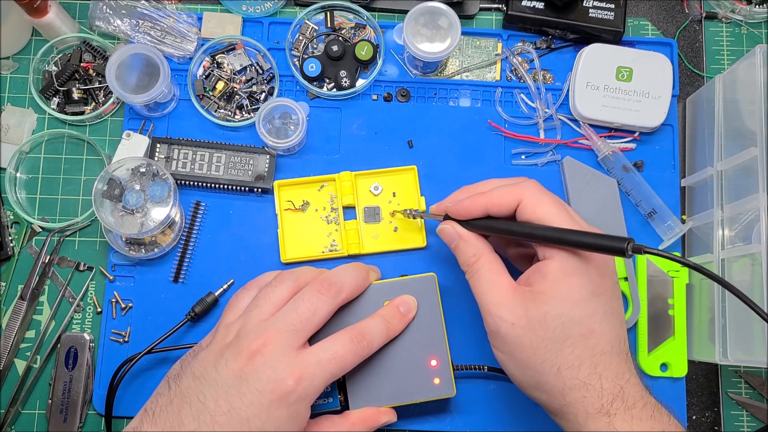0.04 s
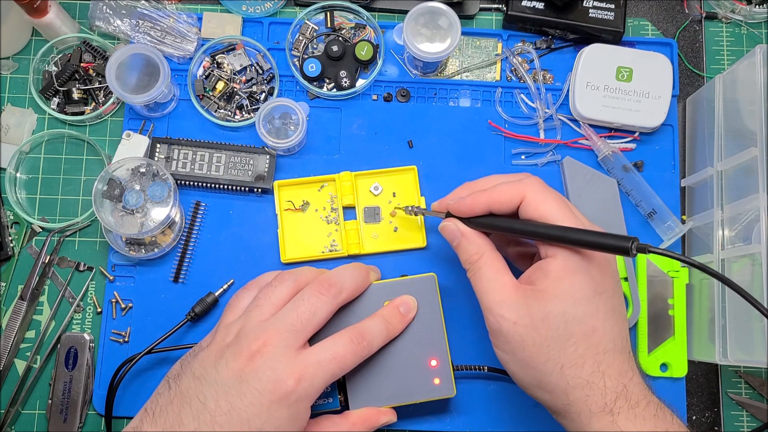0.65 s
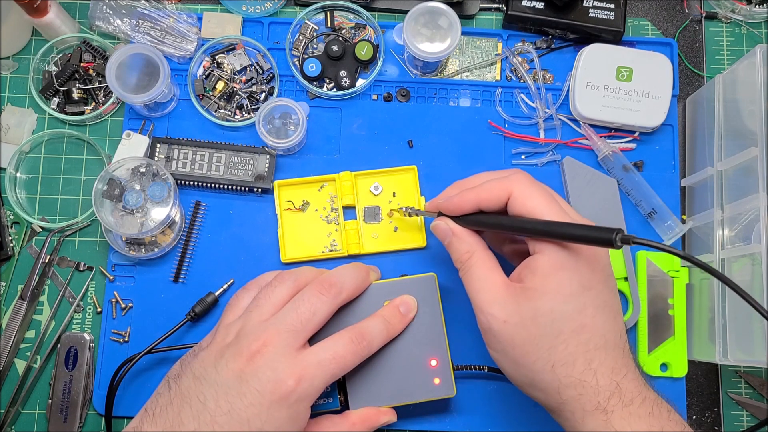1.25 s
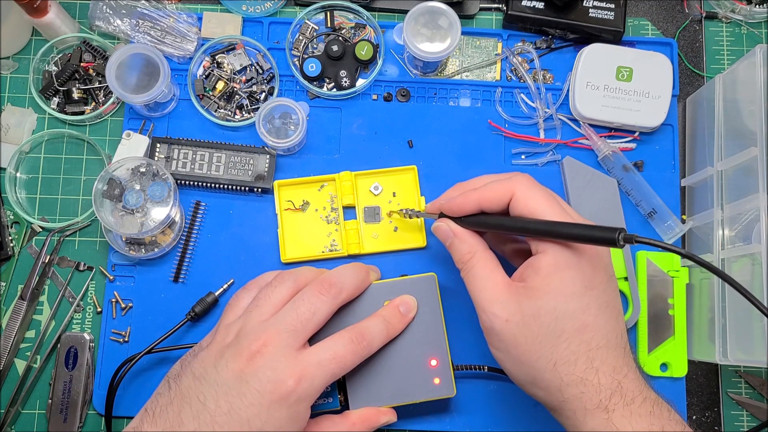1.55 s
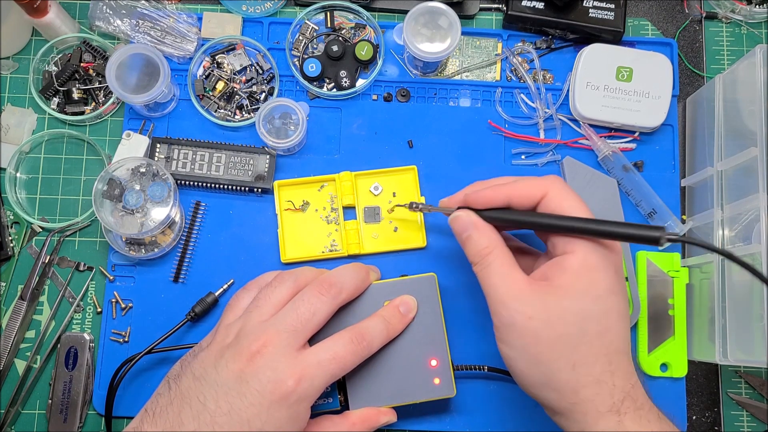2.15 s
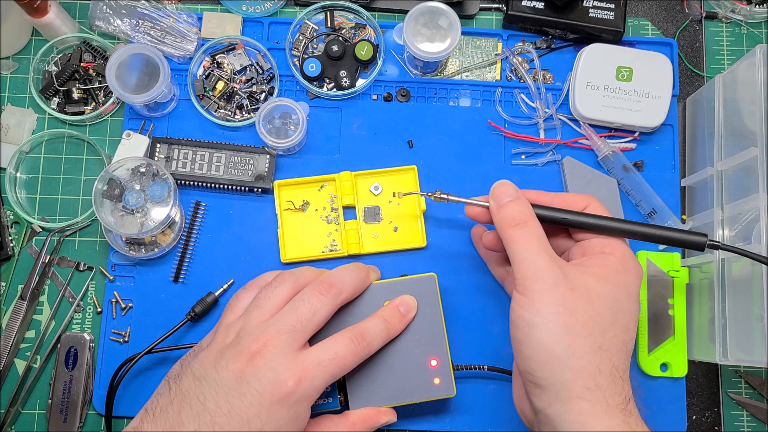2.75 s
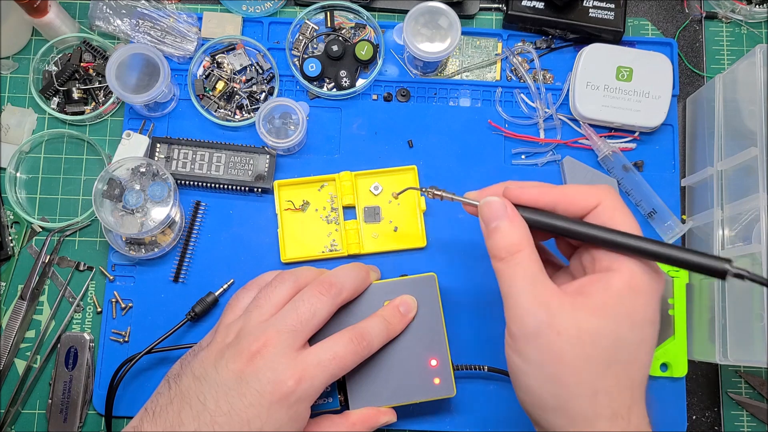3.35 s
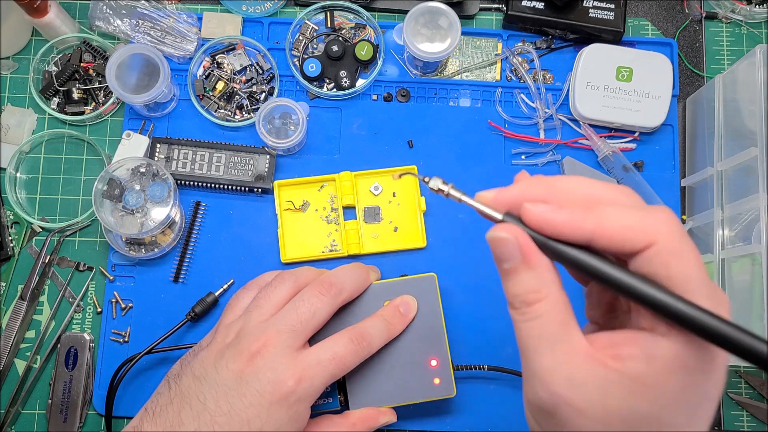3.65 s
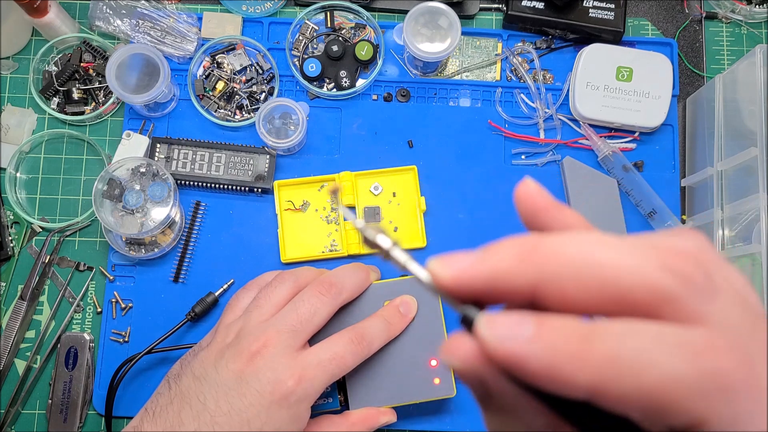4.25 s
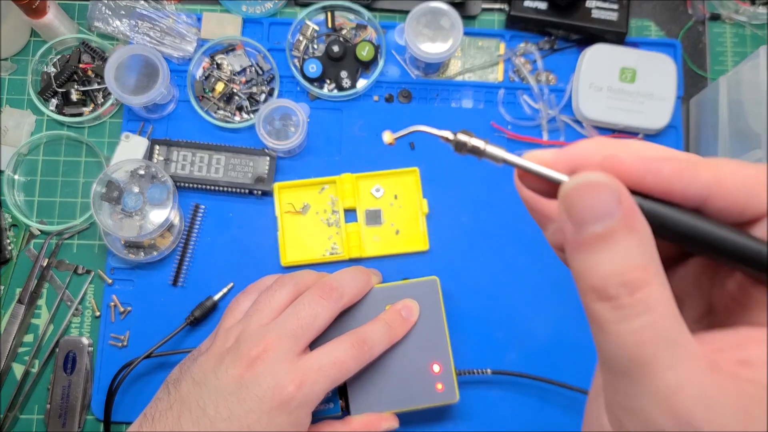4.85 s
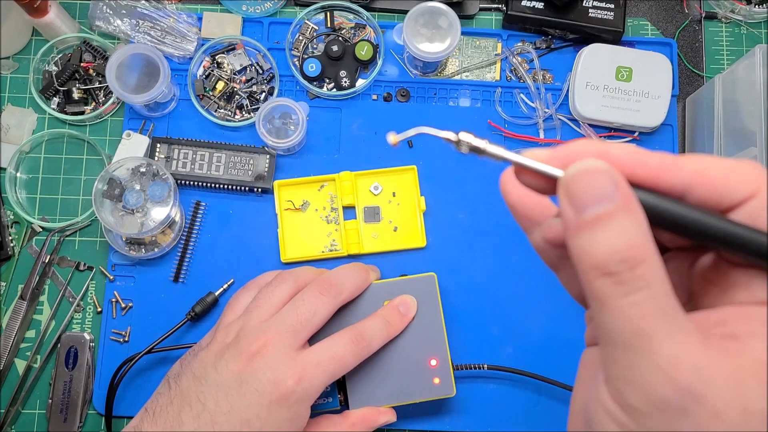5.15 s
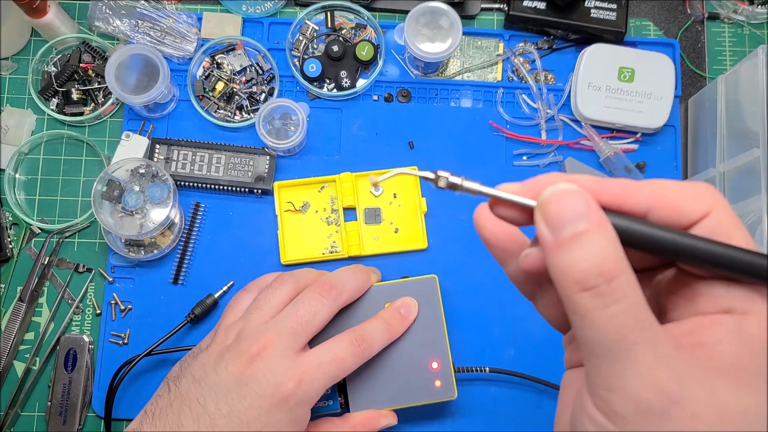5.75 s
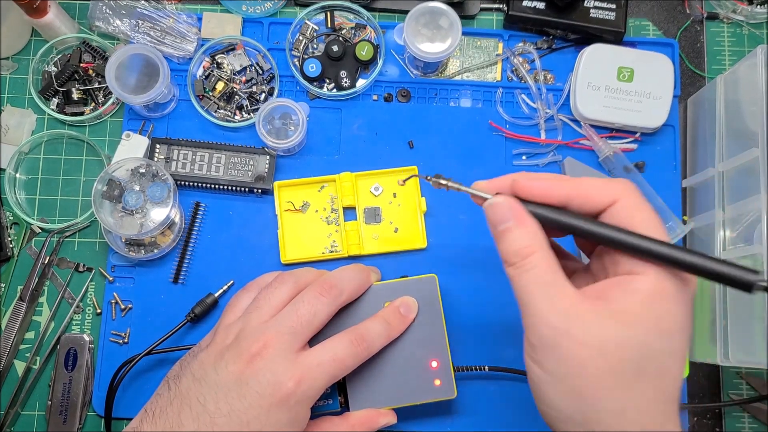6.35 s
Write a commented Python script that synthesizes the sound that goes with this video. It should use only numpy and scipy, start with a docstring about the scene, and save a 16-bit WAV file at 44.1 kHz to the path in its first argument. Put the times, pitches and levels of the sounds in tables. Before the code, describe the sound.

The close, raspy hum of a little vacuum pump sags a bit lower as its pick-up pen loses suction.

```python
"""Vacuum pick-up pen on a workbench

Close to a stereo microphone, a small diaphragm pump buzzes on the bench and feeds a pick-up pen.
With the nozzle sealed it spins fast and light; at about 2 s the pen lets go, air flows, the motor
sags and the buzz changes colour. The pen is then lifted towards the microphone. Motor and diaphragm
hum, valves rasp and air puffs at fixed moments of each turn; hands bump the bench softly."""
import sys
import numpy as np
from scipy import signal
from scipy.fft import rfft, irfft, next_fast_len
from scipy.io import wavfile
from scipy.ndimage import uniform_filter1d

SR = 44100
rng = np.random.default_rng(int(sys.argv[2]) if len(sys.argv) > 2 else 0)


def persist_wave(psi):
    """Save psi, clipped to +-1, as 16-bit WAV."""
    counts = np.round(np.clip(psi, -1, 1) * 32767).astype(np.int16)
    wavfile.write(sys.argv[1], SR, np.atleast_2d(counts).T)


N = 290619
TIME = np.arange(N) / SR
FFT_SIZE = 2 * next_fast_len(N // 2 + 1)
HZ = np.fft.rfftfreq(FFT_SIZE, 1 / SR)
BREAK_S, BREAK_SPREAD_S = 2.04, 0.1  # the seal at the nozzle breaks
RIGHT_LEAD_S = 0.000099  # sound reaches the right of the microphone first


def from_db(db):
    """Decibels to gain."""
    return np.exp(np.asarray(db) * (np.log(10) / 20))


def in_time(rows):
    """Each column of a curve, sample by sample."""
    s, *columns = np.transpose(rows)
    return [np.interp(TIME, s, c) for c in columns]


def at_hz(points, hz, column=1):
    """One column of a spectrum, read on a log-frequency axis."""
    table = np.array(points)
    return np.interp(np.log(hz + 1), np.log(table[:, 0]), table[:, column])


def bell(x, centre, width):
    """A smooth hump of height 1."""
    return np.exp(-.5 * np.minimum(((x - centre) / width) ** 2, 60))


def humps(rows):
    """A smooth rise and fall in time for each row."""
    return sum(height * bell(TIME, s, spread) for s, spread, height in rows)


def drift(rate):
    """A smooth random curve of spread 1 that changes about rate times a second."""
    knots = rng.standard_normal(2048)
    return np.interp(TIME * rate * 4, np.arange(8192), signal.resample(knots, 8192))


def whitened(x):
    """Frequency bins of a sound with its broad colour taken out: 0 dB per Hz."""
    bins = rfft(x, FFT_SIZE)
    power = uniform_filter1d(np.abs(bins) ** 2, size=2400, axis=-1)
    return bins / np.sqrt(power + 1e-3 * power.mean()) * np.sqrt(FFT_SIZE * SR / 2)


def to_samples(bins, gain_db=0):
    """Bins back to samples, with a gain for each frequency."""
    return irfft(bins * from_db(gain_db), FFT_SIZE)[..., :N]


def mid_side(pair):
    """Sum and difference: mid and side to left and right, or back (twice as large)."""
    return np.array([pair[0] + pair[1], pair[0] - pair[1]])


def side_lag(mid, side, left_db, hz):
    """Phase of the side behind the mid: a quarter cycle, more or less as the sound leans."""
    left = from_db(left_db) ** 2
    lean = (left - 1) / (left + 1) * (mid / side + side / mid) / 2
    return np.arccos(np.clip(lean, -.95, .95)) * np.sign(np.sin(2 * np.pi * hz * RIGHT_LEAD_S))


# The motor runs free, sags in two steps as air gets in, then keeps slowing.
# Each row: time in seconds, turns per second.
MOTOR_SPEED = [(0, 118.0), (.2, 118.1), (.33, 117.6), (.48, 117.4), (.68, 118.2), (.79, 117.7), (.9, 118.2),
               (1.2, 117.35), (1.48, 118.05), (1.66, 118.1), (1.84, 117.7), (1.885, 116.3), (2.085, 115.8),
               (2.16, 110.4), (2.21, 108.1), (2.3, 107.1), (2.63, 107.35), (3.05, 107.15), (3.25, 106.8),
               (3.52, 106.85), (3.8, 105.95), (4.2, 105.87), (4.35, 105.63), (4.8, 105.67), (5.25, 105.3),
               (5.55, 105.3), (5.85, 104.7), (6.02, 104.9), (6.59, 104.6)]
# Brief extra loads. Each row: centre and spread in seconds, turns per second lost.
STUMBLES = [(2.02, 0.029, 1.73), (2.48, 0.034, 0.88), (3.29, 0.031, 0.51), (5.73, 0.04, 1.34),
            (6.19, .04, 1.45), (6.32, 0.03, 1.6), (6.44, 0.047, 1.28)]


def motor_speed(shares, wander_turns_per_s=(.11, .06, .059)):
    """Turns per second: the load sets the speed, which wanders most with the nozzle sealed."""
    return in_time(MOTOR_SPEED)[0] - humps(STUMBLES) + np.dot(wander_turns_per_s, shares) * drift(16)


def strain():
    """How hard the motor labours, 0 to 1: most while the seal breaks, and in every stumble."""
    return np.minimum(bell(TIME, BREAK_S, BREAK_SPREAD_S) + humps(STUMBLES) / 2, 1)


# The valves' puffs within one turn. Each row: centre and width in Hz, moment and spread in turns,
# level in dB over the steady flow.
VALVE_PUFFS = [(1520, 500, 0.2, 0.059, 1), (3730, 400, 0.33, 0.083, 18), (3310, 690, 0.526, 0.033, 17),
               (3000, 333, 0.749, 0.027, 24.5), (5300, 500, 0.54, 0.42, -5), (8150, 420, 0.08, 0.13, 14),
               (7040, 570, 0.602, 0.046, 17.5), (11900, 450, 0.82, 0.066, 17),
               (14200, 1800, 0.654, 0.096, 3.5)]


def valve_puffs(flow, turns, hz):
    """Air flow swells just after set moments of each turn, each puff in its own resonance."""
    bins = rfft(flow)
    for centre_hz, width_hz, moment, spread, db in VALVE_PUFFS:
        opening = bell((turns - moment + .5) % 1, 0.528, spread)
        bins = bins + from_db(db) * bell(hz, centre_hz, width_hz) * rfft(flow * opening)
    return irfft(bins, flow.shape[-1])


def stroke_phases():
    """Harmonic phases of the dense rattle of pressure that the pump repeats on every turn."""
    turns = np.arange(400) / 400
    flow = rng.choice([-1., 1.], len(turns))
    pressure = valve_puffs(flow, turns, np.fft.rfftfreq(len(turns), 1 / SR))
    return np.angle(rfft(pressure))


# The hum at the microphone, harmonic by harmonic from the first. Each row: base mid and side levels
# in dB with the nozzle sealed, the same pair with it open, and with the pen lifted.
HUM_HARMONICS = [(-47.5, -64.5, -53, -68, -55, -70), (-48.5, -63, -55.5, -69.5, -57.5, -72),
                 (-61.5, -61.5, -48.5, -61, -48.5, -64), (-65, -72, -52.5, -64, -53, -62),
                 (-58, -59, -49.5, -56, -52, -58), (-49.5, -65, -53.5, -63, -59, -60),
                 (-45.5, -55, -52.5, -64, -63.5, -59), (-44.5, -55, -46.5, -56, -44.5, -58),
                 (-54, -54, -56.5, -59.5, -55.5, -60), (-51, -46.5, -46, -43, -55, -101),
                 (-55.5, -55, -84, -68, -59.5, -85), (-49.5, -48, -61, -58, -59, -57),
                 (-56.5, -67, -49.5, -49, -50.5, -52), (-45, -43.5, -39.5, -62, -48, -51),
                 (-55, -45, -43.5, -54.5, -41.5, -48), (-55, -57.0, -45.5, -49.0, -47, -43.5),
                 (-58.5, -62, -50.5, -52, -54.5, -57), (-44, -70, -58, -50, -54, -57),
                 (-60, -72, -48, -53, -52.5, -64), (-45, -54, -63, -63.5, -59.5, -66.0),
                 (-53, -63, -53, -57, -50.5, -47), (-51, -51, -46, -58.5, -62, -53),
                 (-37.5, -38.5, -43.5, -49, -50, -60), (-44, -45, -48.5, -44, -47, -42),
                 (-45.5, -44, -44.5, -48, -43.5, -43), (-63, -54, -44, -46.5, -53.5, -51.0),
                 (-53, -47, -68, -53, -50.5, -53), (-83, -58.0, -62, -52.0, -64, -47),
                 (-47, -58, -47, -48.5, -57, -50), (-37.5, -48, -65, -40, -46, -36),
                 (-51.5, -33.5, -59, -41.5, -55, -44), (-42, -33.5, -38.5, -49, -42.5, -45),
                 (-45.5, -44, -45, -40, -47.5, -44), (-67, -59, -39.5, -32, -41.5, -37.5),
                 (-87, -48, -50, -38, -52, -52), (-89, -78.0, -51, -43, -42, -37.5),
                 (-55.5, -60.5, -75, -59, -60, -47), (-64, -50, -55, -52, -54, -54)]
# Narrow bench resonances and a dip that the harmonics slide through.
# Each row: centre and width in Hz, gain in dB.
BENCH_MODES = [(723.5, 5.3, -39), (1040, 6.4, 8), (1128, 21, 12.5), (1271, 14, 8.5), (1452, 18.2, 8.5),
               (1872, 19, 6.5), (2063.5, 13, 10.5)]
# Where the hum leans in each state. Each row: frequency in Hz, left minus right in dB.
HUM_PAN_SEALED = [(120, -0.5), (350, 7), (710, -4.5), (1180, 6), (1410, -12.0), (1650, 5), (2830, -5),
                  (2950, 8.5), (3180, -6.0), (3650, 4.5), (4480, 7)]
HUM_PAN_OPEN = [(110, -0.5), (860, 0.5), (960, 10), (1390, -4.5), (2030, 11), (2140, 2), (3320, 0.5),
                (3640, 6), (3740, 2), (3850, 10), (4070, 9)]
HUM_PAN_LIFTED = [(110, 0), (530, 1.5), (630, -10), (1060, 13.5), (1480, -11), (1690, 11.5), (2640, -7),
                  (2850, 4.5), (3380, -9), (3590, 3), (4010, 18)]


def pump_hum(speed, turns, shares, buzz_db, waver_db=(1.5, .9), flutter=.22, scatter_rad=.24):
    """Motor and diaphragm: clean low harmonics; higher ones follow buzz_db more, and flutter."""
    out, phases = np.zeros((2, N)), stroke_phases()
    low = 18  # intake and exhaust give these harmonics two beats a turn, blurring higher up
    phases[:low] = np.arange(low) % 2 * np.pi / 2 + phases[:low] * np.linspace(0, .5, low)
    t, slow_speed, slow_shares = TIME[::128], speed[::128], shares[:, ::128]
    pans = (HUM_PAN_SEALED, HUM_PAN_OPEN, HUM_PAN_LIFTED)
    for k, levels in enumerate(HUM_HARMONICS, 1):
        height, hz = k / len(HUM_HARMONICS), k * slow_speed
        modes_db = sum(db * bell(hz, f, width) for f, width, db in BENCH_MODES)
        modes_db += sum(db * bell(hz, f, width) * bell(t, s, spread)
                        for s, spread, f, width, db in pen_resonances())
        wavering_db = np.interp(height, (0, 1), waver_db) * drift(7)
        gain = from_db(np.interp(TIME, t, modes_db) + buzz_db * min(2 * height, 1) + wavering_db)
        gain *= 1 + flutter * height * drift(70)
        powers = from_db(np.reshape(levels, (3, 2)).T) ** 2
        left_db = sum(share * at_hz(pan, hz) for share, pan in zip(slow_shares, pans))
        lag = side_lag(*np.sqrt(powers @ slow_shares), left_db, hz.mean())
        lag += scatter_rad * (2 * rng.random() - 1)
        mid_angle = 2 * np.pi * (k * turns % 1) + phases[k]
        side_angle = mid_angle - np.interp(TIME, t, lag)
        out += gain * np.sqrt(powers @ shares) * np.sin(np.float32([mid_angle, side_angle]))
    return mid_side(out)


# Reflections off hand and pen. Each row: changes per second, strength relative to the direct sound.
REFLECTIONS = [(.8, 0.46), (2, 0.36), (5, 0.41), (14, 0.42)]


def valve_buzz(turns):
    """The valve pattern repeats each turn, all harmonics equal; shifting reflections add shimmer."""
    stroke = np.exp(1j * stroke_phases())
    pattern = irfft(stroke, 8192)
    place = (turns % 1 * len(pattern)).astype(int)
    out, power = pattern[place], 1
    for per_s, share in REFLECTIONS:
        scrambled = stroke * np.exp(2j * np.pi * rng.random((2, len(stroke))))
        strength = share * drift(per_s)
        out = out + strength * irfft(scrambled, len(pattern))[:, place]
        power = power + strength ** 2
    return out / pattern.std() * np.sqrt(SR / 2 / power)


# The casing's resonances at the microphone in each state. Each row: frequency in Hz, base mid and
# side levels in dB per Hz, left minus right in dB.
CASING_SEALED = [(4120, -79.0, -79.0, 4.0), (4360, -77.0, -80.0, 0.0), (4600, -67.0, -69.0, -3.0),
                 (4710, -75.0, -69.0, -3.0), (4950, -61.5, -65.5, -1.5), (5070, -68.5, -63.0, 0.5),
                 (5300, -84.0, -88.5, -1.0), (5420, -72.5, -73.5, -5.5), (5660, -83.5, -73.0, 0.5),
                 (5780, -71.0, -72.0, 0.0), (5900, -73.0, -77.0, 0.0), (6130, -69.0, -78.5, -0.5),
                 (6360, -83.0, -77.5, -2.5), (6480, -73.5, -73.5, -7.5), (6600, -70.0, -74.0, -5.0),
                 (6960, -79.0, -82.0, 0.0), (7190, -72.0, -71.0, 2.0), (7310, -81.0, -79.0, 3.5),
                 (7420, -61.5, -68.5, 5.5), (7545, -69.0, -74.0, 3.0), (7780, -63.5, -67.0, 1.0),
                 (8010, -75.0, -75.5, -1.5), (8250, -62.0, -68.0, 4.0), (8370, -63.5, -64.0, 6.0),
                 (8490, -72.5, -73.5, -4.0), (9900, -76.5, -78.0, -6.0), (10720, -68.5, -70.5, 0.5),
                 (10960, -80.0, -74.5, -1.5), (11430, -60.5, -67.5, -5.0), (11780, -69.0, -71.0, 5.5),
                 (12010, -66.0, -69.0, 3.0), (12500, -69.5, -68.5, 0.0), (13200, -68.0, -63.0, -5.5),
                 (13700, -71.0, -69.5, -5.0), (14250, -65.5, -68.0, -5.0), (14500, -66.5, -72.0, -5.0),
                 (14610, -74.0, -75.5, -4.5), (15560, -69.0, -68.0, -6.5)]
CASING_OPEN = [(4070, -82.0, -78.0, 4.0), (4170, -89.5, -86.0, 5.5), (4280, -70.0, -74.5, 2.5),
               (4400, -79.0, -83.0, 0.0), (4600, -85.5, -89.0, -2.5), (4710, -70.5, -72.5, -7.0),
               (4920, -64.5, -65.5, -3.5), (5030, -76.0, -74.5, -3.5), (6310, -78.5, -76.5, -2.0),
               (7060, -64.5, -67.0, -4.5), (7170, -72.5, -71.5, 4.5), (7280, -63.5, -67.5, 5.5),
               (7380, -79.5, -81.5, 1.5), (7500, -83.0, -80.0, 0.0), (7710, -69.0, -71.0, -3.0),
               (7920, -64.5, -67.5, -6.0), (8020, -76.5, -73.0, -1.5), (8130, -68.5, -73.0, -6.0),
               (8450, -77.5, -74.0, -2.0), (9200, -72.0, -76.0, -10.5), (9840, -80.5, -82.5, 0.0),
               (12410, -69.5, -67.0, -1.0), (13380, -73.5, -72.0, -4.0), (13480, -78.0, -75.0, -1.0),
               (13910, -68.0, -70.0, -8.0), (14020, -74.5, -77.0, -5.5), (15520, -71.0, -71.5, -4.0)]
CASING_LIFTED = [(4120, -86.5, -85.5, -3.0), (4220, -78.0, -76.0, 6.5), (4750, -74.5, -75.5, 4.0),
                 (4860, -72.5, -70.5, -7.0), (5070, -81.0, -76.0, -3.0), (5170, -73.5, -78.0, -0.5),
                 (5390, -83.0, -77.0, 0.5), (5600, -75.0, -81.5, 0.0), (6440, -79.5, -74.0, -5.5),
                 (6650, -72.5, -68.0, 0.0), (6760, -80.0, -76.5, -1.5), (7180, -67.0, -67.5, -2.5),
                 (7290, -76.5, -80.5, 0.5), (7390, -68.0, -69.5, -0.5), (7920, -74.5, -79.5, -3.0),
                 (8030, -65.5, -70.0, -3.0), (8340, -75.5, -75.0, 6.0), (8900, -73.5, -76.0, -5.0),
                 (9190, -80.0, -81.0, -10.0), (9400, -76.5, -78.5, -6.0), (10670, -81.0, -83.5, 2.0),
                 (11510, -66.5, -73.5, -3.0), (12250, -77.0, -76.0, 5.0), (12670, -71.5, -64.0, -3.5),
                 (12780, -76.0, -77.0, -2.5), (15520, -71.5, -71.0, -7.5)]


def valve_rasp(turns, rush, shares, lowest_hz=4100, hiss_db=-12):
    """Valve buzz and turbulence pass through the same casing resonances, above the hum."""
    above_hum = 1 / np.sqrt(1 + (lowest_hz / (HZ + 100)) ** 40)
    buzz = rfft(valve_buzz(turns), FFT_SIZE)
    hiss = from_db(hiss_db) * whitened(mid_side(rush))
    out = 0
    for share, casing in zip(shares, (CASING_SEALED, CASING_OPEN, CASING_LIFTED)):
        mid, side = from_db(at_hz(casing, HZ)), from_db(at_hz(casing, HZ, column=2))
        lag = np.exp(-1j * side_lag(mid, side, at_hz(casing, HZ, column=3), HZ))
        stereo = mid_side([mid * (buzz[0] + hiss[0]), side * (lag * buzz[1] + hiss[1])])
        out = out + share * to_samples(above_hum * stereo)
    bins = rfft(out, FFT_SIZE)
    for s, spread, hz, width, db in pen_resonances():
        if hz > lowest_hz:
            swell = from_db(db * bell(TIME, s, spread)) - 1
            out += swell * to_samples(bins * bell(HZ, hz, width))
    return out


def valve_flicker(rasp, flicker_db=1.0, flicker_per_s=11, sputter_db=(.7, 2.2), sputter_per_s=45):
    """Valves never seat twice alike: treble bands flicker and strokes sputter, more under strain."""
    bins, centres_hz = rfft(rasp, FFT_SIZE), np.geomspace(4500, 15000, 7)
    depth_db = np.interp(strain(), (0, 1), sputter_db)
    together = drift(sputter_per_s)
    out = 0
    for band in np.eye(len(centres_hz)):
        db = flicker_db * drift(flicker_per_s) + depth_db * (together + drift(sputter_per_s)) / 2
        out = out + from_db(db) * to_samples(bins * np.interp(HZ, centres_hz, band))
    return out


def air_rush(turns, shares, state_db=(-7.5, -11, -8.5), gulp_s=2.22, gulp_spread_s=.11, gulp_db=4.5):
    """Turbulence puffs in step with the valves and surges as air is gulped past the broken seal."""
    flow = valve_puffs(rng.standard_normal(FFT_SIZE), np.resize(turns, FFT_SIZE), HZ)[:N]
    level_db = np.dot(state_db, shares) + gulp_db * bell(TIME, gulp_s, gulp_spread_s)
    return room(flow * from_db(level_db))


def room(x, t60_s=.22, tail_db=-.5):
    """The room round the bench: direct sound, right side first, then a short tail on each side."""
    t = TIME[:SR // 4]
    response = rng.standard_normal((2, len(t))) * from_db(-60 * t / t60_s)
    response *= from_db(tail_db) / np.sqrt(np.sum(response ** 2, axis=1, keepdims=True))
    response[0, round(RIGHT_LEAD_S * SR)] += 1
    response[1, 0] += 1
    return signal.fftconvolve(x[None], response, axes=1)[:, :N]


# Air noise, nozzle sealed and open. Each row: frequency in Hz, base level in dB per Hz.
AIR_SEALED = [(180, -97.5), (530, -97.5), (1710, -81.5), (1830, -87.5), (2530, -85.5), (2770, -76.5),
              (3120, -90.5), (3590, -76.5), (3950, -81.0), (4180, -96.5), (4300, -87.0), (5500, -105.0)]
AIR_OPEN = [(160, -96.0), (260, -87.0), (580, -88.5), (690, -92.5), (1210, -88.0), (1560, -80.5),
            (2270, -88.5), (2480, -81.5), (3010, -86.5), (3220, -83.0), (3750, -80.5), (4070, -90.5),
            (5500, -105.0)]


def air_noise(rush, sealed, gain_db=2):
    """Faint turbulence between the hum's harmonics, thinner while the nozzle is sealed."""
    bins = whitened(rush)
    thin, full = to_samples(bins, at_hz(AIR_SEALED, HZ)), to_samples(bins, at_hz(AIR_OPEN, HZ))
    return from_db(gain_db) * (sealed * thin + (1 - sealed) * full)


# The bench's low rumble. Each row: frequency in Hz, base level in dB per Hz.
RUMBLE = [(20, -112), (50, -91.5), (80, -83.5), (130, -103.5), (250, -102), (600, -125)]
# The hands shift. Each row: centre and spread in seconds, rise in dB.
HANDLING = [(3.1, 0.14, 10), (5.32, 0.046, 6), (5.87, 0.11, 9)]


def bench_rumble(shares, state_db=(-5, -1.5, .5), stereo_db=-4, lumpy_db=2):
    """The bench rumbles faintly and swells as the hands shift on it."""
    noise = rng.standard_normal(N) + from_db(stereo_db) * rng.standard_normal((2, N))
    level_db = np.dot(state_db, shares) + humps(HANDLING) + lumpy_db * drift(5.4)
    return to_samples(whitened(noise), at_hz(RUMBLE, HZ)) * from_db(level_db)


# Soft bumps on the bench. Each row: start in seconds, level in dB.
BUMPS = [(0.055, -42), (0.101, -41.5), (.47, -61), (5.77, -55)]
# The bench's thud. Each row: frequency in Hz, relative level in dB, seconds to fall by 60 dB.
THUD_MODES = [(46, 0, 0.44), (70, 6, 0.13), (115, -7, .06)]


def bench_bumps(attack_s=.0032):
    """Dull bumps ring the bench's low modes; only those within the first second sound."""
    out = np.zeros(N)
    for start_s, level_db in BUMPS:
        t = np.maximum(TIME[:SR] - start_s, 0)
        thud = sum(from_db(level_db + db - 60 * t / t60) * np.sin(2 * np.pi * hz * t)
                   for hz, db, t60 in THUD_MODES)
        out[:SR] += (1 - np.exp(-t / attack_s)) * thud
    return out


# Resonances as the seal breaks, and as the pen comes down at the end.
# Each row: centre and width in Hz, greatest change in dB.
BREAK_MODES = [(444, 28, 6.5), (1630, 220, 9.5), (2730, 98, 8.5), (3750, 180, 7), (5170, 98, 5.5),
               (8100, 260, 3)]
LOWERING_MODES = [(413, 30, -9), (830, 44, 2.5), (1600, 84, 2.5), (4800, 130, 4.5), (6500, 138, 2),
                  (7230, 130, 5), (14200, 300, 3)]
# Further resonances that swell or fade briefly: as the seal breaks, while the pen is open and held up, and as
# it comes down. # Each row: moment and spread in seconds, centre and width in Hz, greatest change in dB.
PASSING_MODES = [(2.12, 0.025, 1610, 130, 2), (2.125, 0.013, 3650, 250, 7), (2.125, 0.017, 8200, 220, 10),
                 (4.8, 0.14, 7100, 170, 3), (2.6, .1, 4950, 62, 6), (3.05, 0.19, 4900, 71, 1),
                 (3.6, 0.089, 4780, 68, -3), (3.3, 0.094, 8700, 200, 8), (3.9, .4, 3410, 60, 3),
                 (3.56, 0.075, 7300, 130, 8), (3.84, 0.41, 990, 130, -5), (5.76, 0.091, 1600, 90, 2),
                 (5.7, .4, 7380, 90, -6), (6.0, .2, 3540, 70, -2), (6.15, .04, 6600, 250, 6)]


def pen_resonances(lowering_s=6.74, lowering_spread_s=.77):
    """Every resonance that swells or fades as the pen lets go, is held up and comes down."""
    breaking = [(BREAK_S, BREAK_SPREAD_S, *mode) for mode in BREAK_MODES]
    lowering = [(lowering_s, lowering_spread_s, *mode) for mode in LOWERING_MODES]
    return breaking + lowering + PASSING_MODES


# What the pen is doing. Each row: time in seconds, state (0 sealed, 1 open, 2 lifted).
PEN_STATE = [(0, 0), (1.85, 0), (1.9, 0.15), (2.08, 0.22), (2.2, 1), (3.55, 1.18), (3.87, 1.96)]
# The rasp moves right as the pen is held up. Each row: time in seconds, left minus right in dB.
PEN_PAN = [(1.9, -0.5), (4.7, -0.5), (5.6, -2)]


def scene(hum_db=-.03, rasp_db=-.96, unsteady_db=.7, slack_db=-8.5, ease_db_per_s=.8):
    """The motor's angle drives hum, valves and air together; the pen's state sets their strength."""
    state, = in_time(PEN_STATE)
    # Shares of sealed, open and lifted; settings in threes follow this order.
    shares = np.maximum(1 - np.abs(np.clip(state, 0, 2) - np.arange(3)[:, None]), 0)
    sealed = shares[0]
    speed = motor_speed(shares)
    jitter_turns = np.interp(strain(), (0, 1), (.0007, .002)) * drift(60)
    turns = np.cumsum(speed) / SR + jitter_turns
    # The diaphragm's buzz slackens while the seal breaks.
    buzz_db = np.dot((1.57, .37, -.37), shares) + slack_db * bell(TIME, BREAK_S, BREAK_SPREAD_S)
    # The rasp eases as the vacuum builds behind the sealed nozzle.
    easing_db = sealed * ease_db_per_s * (BREAK_S / 2 - TIME)
    valve_db = rasp_db + np.dot((.3, 0, .5), shares) + easing_db + unsteady_db * drift(4.81)
    pan_db = in_time(PEN_PAN)[0] * np.array([[.5], [-.5]])
    rush = air_rush(turns, shares)
    hum = from_db(hum_db) * pump_hum(speed, turns, shares, buzz_db)
    valves = from_db(valve_db + pan_db) * valve_flicker(valve_rasp(turns, rush, shares))
    return hum + valves + air_noise(rush, sealed) + bench_rumble(shares) + bench_bumps()


def record(dry, cutoff_hz=15800):
    """The top of the treble is cut steeply."""
    return signal.sosfilt(signal.ellip(12, .1, 90, cutoff_hz, fs=SR, output="sos"), dry)


dry = scene()
out = record(dry)
persist_wave(out)
```